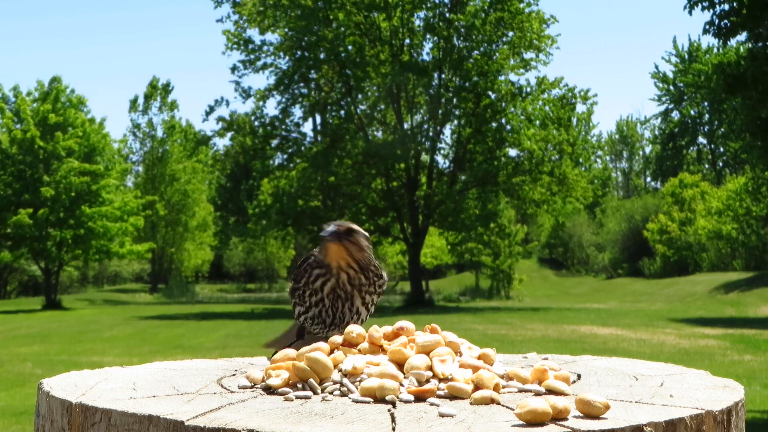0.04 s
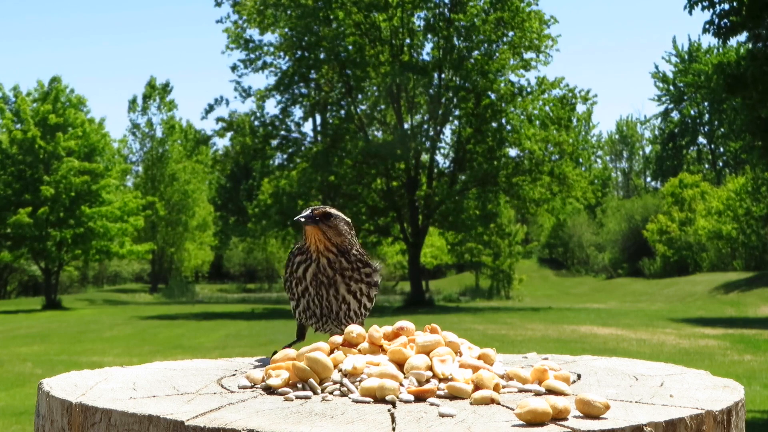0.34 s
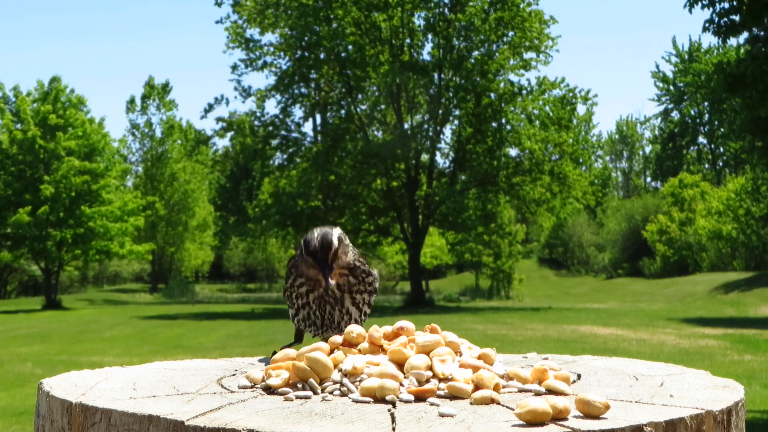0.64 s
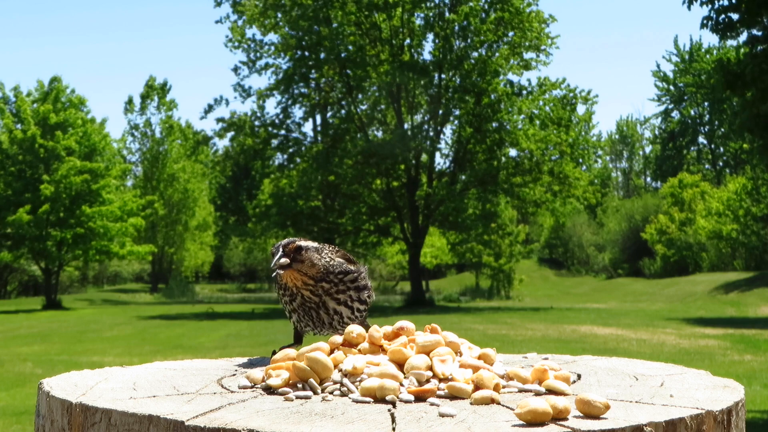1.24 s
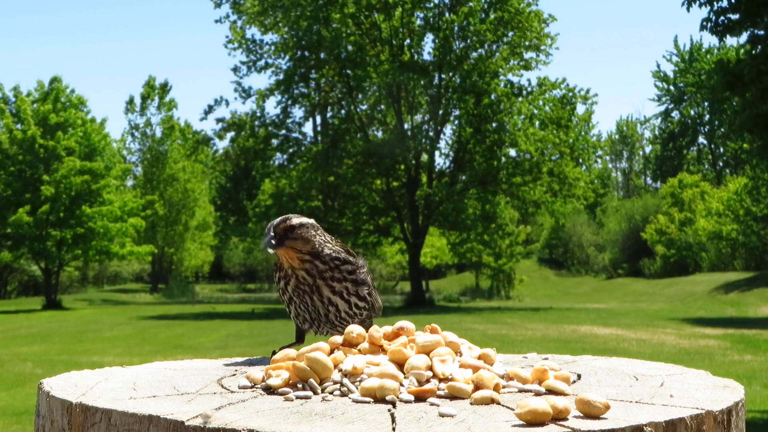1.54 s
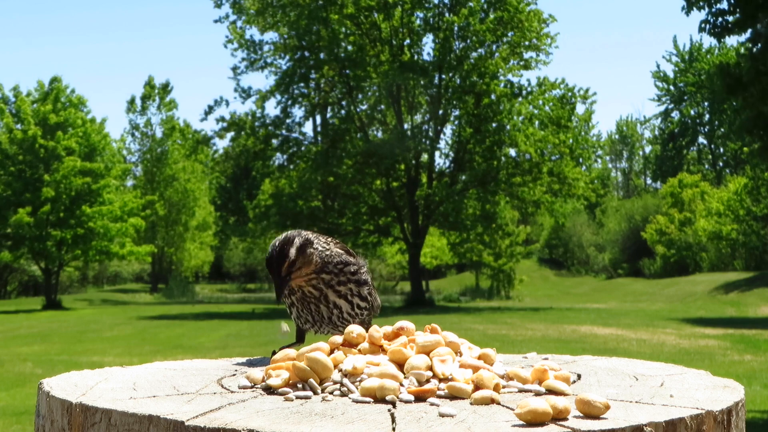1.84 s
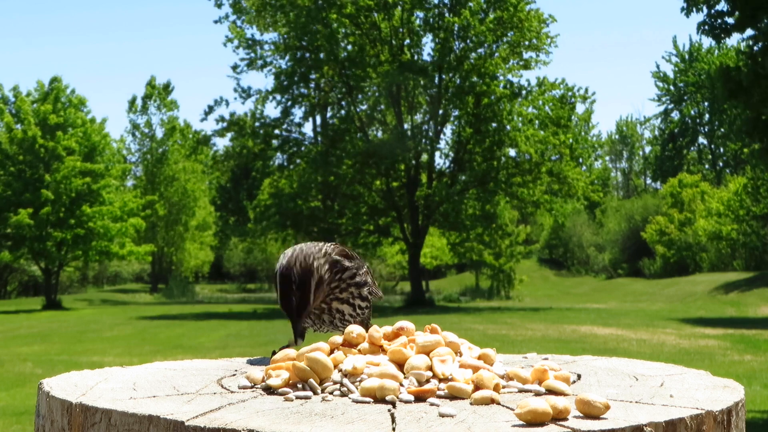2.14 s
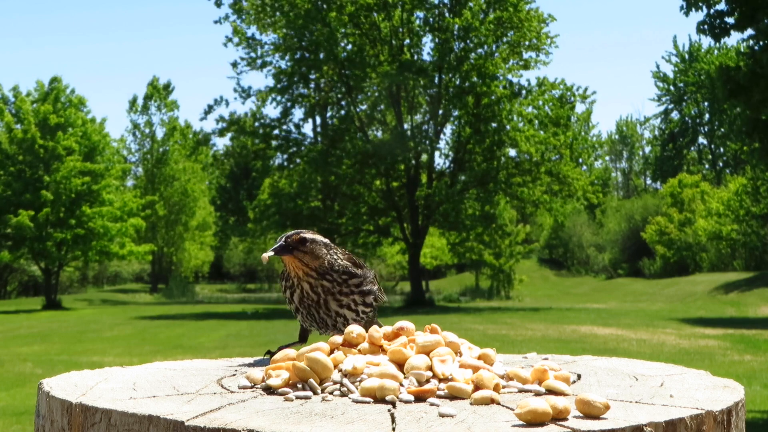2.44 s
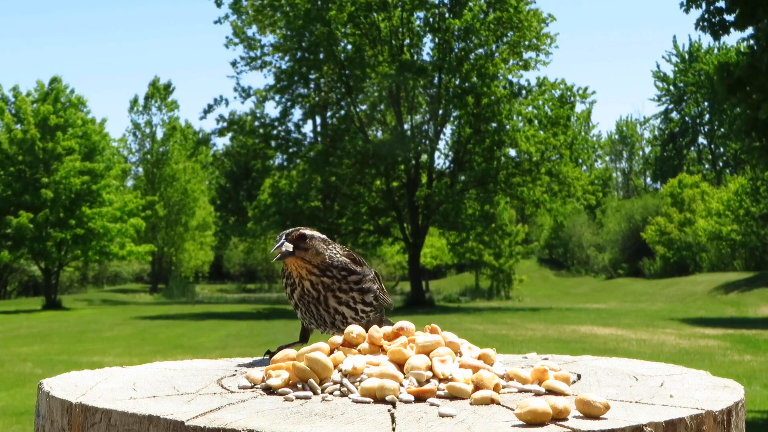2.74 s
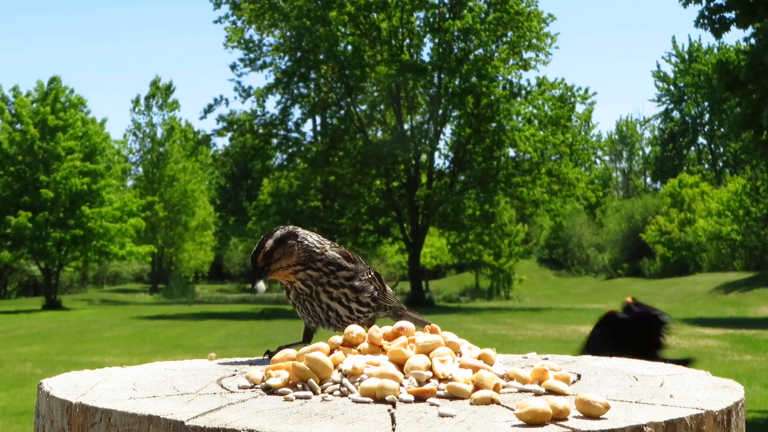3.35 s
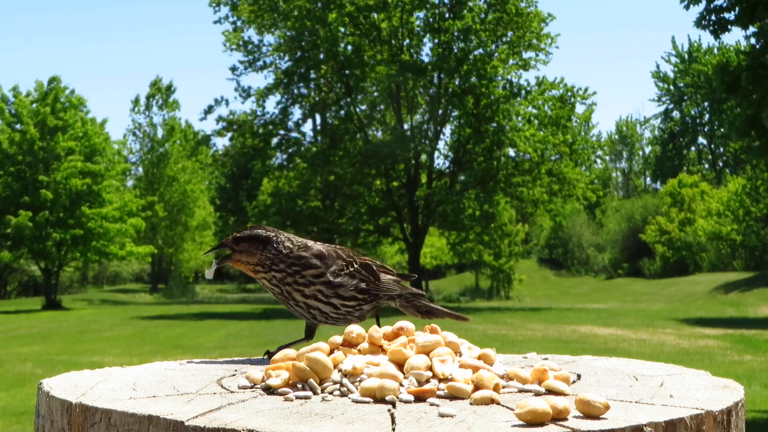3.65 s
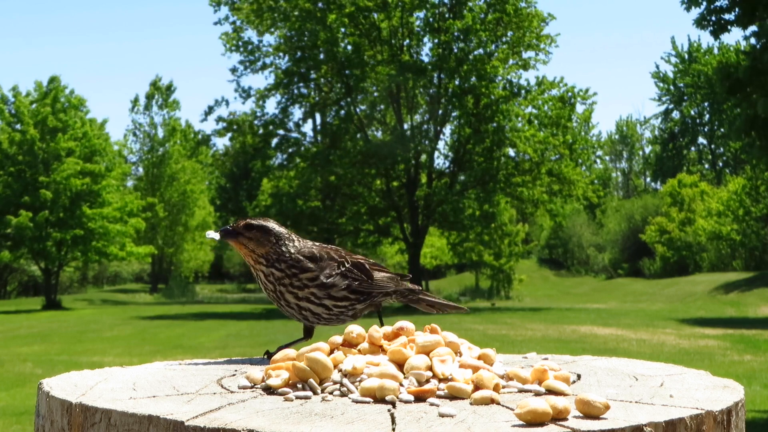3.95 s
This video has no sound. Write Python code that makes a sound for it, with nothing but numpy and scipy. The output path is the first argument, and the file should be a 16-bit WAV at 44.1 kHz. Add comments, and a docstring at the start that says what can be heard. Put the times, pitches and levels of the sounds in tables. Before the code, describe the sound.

A blackbird feeds quietly, then gives eight sharp, loud chips close by in a breezy yard.

```python
"""A blackbird close by gives eight sharp chip notes, each an arch of pitch made by the two sides of
its voice box (the syrinx). It also feeds on a stump: seeds tick in its bill, a wing or foot
rustles, and there is one harsh "chuck". Behind it a breeze blows, a distant mower drones and far
birds whistle from the trees. The recorder adds a glassy edge and a high fizz to the loud chips,
and its gain control turns the whole yard down under them."""
import sys
import numpy as np
from scipy import signal
from scipy.fft import rfft, irfft
from scipy.io import wavfile

SR = 44100
rng = np.random.default_rng(int(sys.argv[2]) if len(sys.argv) > 2 else 0)


def log_audio(samples):
    """Write samples as a 16-bit WAV file to the path given in sys.argv[1]."""
    # one column per channel
    frames = np.atleast_2d(samples).T
    # limit to full scale, then quantise
    limited = np.clip(frames, -1, 1)
    pcm = np.round(limited * 32767).astype(np.int16)
    wavfile.write(sys.argv[1], SR, pcm)


N = 176400
TIME = np.arange(N) / SR

# the breeze and the haze of far birdsong, from low to high pitch: f/Hz, relative level per Hz/dB
BREEZE_AND_HAZE = [(15, -40), (25, -18), (59, -4.5), (90, -8), (154, -8), (301, -9.5), (373, -11),
                   (588, -12), (637, -10), (1860, -20), (4150, -20.5), (5000, -26.5), (9270, -32.5),
                   (12800, -97), (15000, -69)]
# how loud the breeze and haze are over time: t/s, level/dB
BREEZE_LEVEL = [(0, -39), (.5, -39.5), (1.0, -39.5), (1.6, -40), (2.4, -40.5), (3.1, -40), (4, -38)]
# how alike they are on the left and right: f/Hz, likeness (1 = the same)
BREEZE_LIKENESS = [(60, 0.98), (130, 0.33), (290, -0.4), (640, 0.25), (1410, 0.68), (3100, 0.58),
                   (6820, 0.84), (15000, 1)]
# puffs of wind on the microphone: t/s, half-length/s, level/dB, f/Hz
WIND_PUFFS = [(0.058, .04, -38, 56), (1.01, 0.052, -42, 166), (2.808, 0.17, -53, 52.6)]
# the tones of the mower's engine: multiple of the firing rate, level/dB
ENGINE_TONES = [(1, -51.5), (2, -59.5), (3, -61), (4, -61.5), (6, -60), (7, -60.5)]
# far whistles: t/s, length/s, first f/Hz, target f/Hz, glide time/s, relative level/dB, width/Hz
FAR_WHISTLES = [(0.041, 0.28, 4210, 3500, .2, -48, 1000), (.17, 0.31, 3284, 2885, .15, -47.5, 1120),
                (0.698, 0.12, 4470, 4280, 0.076, -45.5, 650), (0.786, .13, 3900, 3340, 0.072, -48, 800),
                (0.808, 0.24, 3150, 2900, .08, -49, 330), (1.058, 0.11, 3690, 3000, 0.057, -45.5, 900),
                (1.13, 0.18, 3160, 2850, 0.12, -47, 300), (1.36, 0.28, 4460, 4100, .2, -49, 650),
                (1.479, 0.38, 3600, 2648, 0.15, -45, 1330), (1.769, 0.16, 4530, 4470, .11, -43, 650),
                (1.766, 0.37, 6720, 6390, 0.1, -54, 1100), (1.872, .26, 3900, 3015, 0.098, -39.5, 1100),
                (2.062, .34, 3230, 2860, .17, -45.5, 560), (2.424, .2, 2460, 2093, .063, -48.5, 70),
                (2.564, 0.25, 4160, 4150, 0.082, -50, 448), (2.905, 0.14, 2395, 2350, 0.054, -45.5, 30),
                (2.879, 0.31, 4150, 2950, 0.22, -43, 1500), (3.021, 0.094, 3100, 2106, 0.065, -41, 110),
                (3.075, 0.073, 2620, 2153, .0185, -45.5, 130)]
# echoes off the stump, lawn and trees: delay/s, level/dB, fade time/s (to -60 dB), stereo width
YARD_ECHOES = [(.005, -12, 0.034, 0.062), (.014, -17, 0.12, 0.57), (.026, -29.5, .025, .3),
               (.03, -28, 0.64, 0.48)]
# seed ticks and, last, one soft low rustle of a wing or foot:
# t/s, level before filtering/dB, fade time/s, low f/Hz, high f/Hz
TICKS_AND_RUSTLE = [(.2545, -24.5, .003, 2500, 10000), (.4494, -44, .002, 2000, 9000),
                    (1.4682, -13.5, 0.00022, 1700, 6400), (1.8892, -11, 0.0015, 3000, 7500),
                    (2.962, -25.5, 0.004, 2000, 6770), (3.6876, -24.5, .001, 3000, 8000),
                    (3.697, -13, .008, 800, 2600)]
# chip notes: t/s, time until the fall/s, top f/Hz, relative level/dB, swell time/s, second voice/dB,
# its entry/s, recorder's edge/dB, extra octave in the fall/dB, octave/dB, recorder's fizz/dB, release/s
CHIP_NOTES = [(3.1830, .0200, 4803, 2, .0085, -22, .009, -8.5, -20, -31, -26.5, 0.0097),
              (3.2521, .0310, 4597, 8, 0.0094, -15, 0.0037, -9.5, -30, -18, -28, 0.0097),
              (3.3374, 0.034, 4444, 8, 0.014, -14, 0.024, -22, -16, -23.5, -26, 0.011),
              (3.4281, 0.03, 4470, 5, 0.019, -13, 0.014, -21, -6.5, -15.5, -22, 0.013),
              (3.5863, .0260, 4550, 7, 0.016, -21, 0.011, -19, -3, -26, -23, 0.012),
              (3.731, .0255, 4504, 6.5, 0.0048, -6.5, 0.019, -14, -9, -21.5, -15, .012),
              (3.8721, 0.024, 4590, 9, 0.0057, -10.5, .0073, -9, 1, -15.5, -17, .012),
              (3.9767, .0270, 4490, 10.5, 0.0039, -5.5, .012, -16, 0, -18, -24, .012)]


def from_db(db):
    """Turn decibels into a gain to multiply by."""
    return 10 ** (np.asarray(db) / 20)


def rms_one(x):
    """Scale a signal so its average strength (rms) is 1."""
    return x / np.sqrt(np.mean(x ** 2) + 1e-20)


def at_hz(points, hz):
    """Read between a table's rows, with octaves evenly spaced."""
    table_hz, values = np.transpose(points)
    return np.interp(np.log(hz), np.log(table_hz), values)


def band(x, low_hz, high_hz, order=2):
    """Keep what lies between two frequencies."""
    sos = signal.butter(order, [low_hz, high_hz], "band", fs=SR, output="sos")
    return signal.sosfilt(sos, x + 1e-18)


def low_pass(x, hz, order=10):
    """Cut the treble; a higher order cuts more steeply."""
    return signal.sosfilt(signal.butter(order, hz, fs=SR, output="sos"), x + 1e-18)


def resonance(x, hz, width_hz):
    """Let one frequency through at full strength and weaken those around it."""
    r = np.exp(-np.pi * width_hz / SR)
    feedback = [1, -2 * r * np.cos(2 * np.pi * hz / SR), r * r]
    return signal.lfilter(np.array([1, 0, -1]) * (1 - r * r) / 2, feedback, x + 1e-18)


def drift(rate_hz):
    """A smooth random wobble of size about 1 that changes at about this rate."""
    hz = np.arange(N // 2 + 1) * SR / N
    return rms_one(irfft(rfft(rng.standard_normal(N)) / (1 + (hz / rate_hz) ** 2), N))


def phase_of(hz):
    """Add up a changing pitch into the angle of a sine wave."""
    return 2 * np.pi * np.cumsum(hz) / SR


def echo_cloud(x, fade_s, delay_s=0, clump_db=4.5):
    """Countless small echoes from grass and leaves arrive in clumps, different on each side."""
    t = TIME[:SR]
    tail = rng.standard_normal((2, SR)) * from_db(clump_db * drift(50)[:SR] - 60 * t / fade_s)
    tail *= t >= delay_s
    return signal.fftconvolve(x[None], tail / np.sqrt(np.sum(tail ** 2) / 2), axes=1)[:, :N]


def breeze():
    """Wind and a haze of far birdsong as flickering bands of noise, with low puffs on the microphone."""
    edges_hz = 22 * 2 ** np.arange(0, 9.6, .5)   # half an octave apart
    out, gust, noise = 0, drift(0.67), rng.standard_normal((2, 2, N))
    for k, (low, high) in enumerate(zip(edges_hz, edges_hz[1:])):
        mid, side = band(noise[k % 2], low, high)   # what left and right share, and how they differ
        hz = np.sqrt(low * high)
        alike = at_hz(BREEZE_LIKENESS, hz)
        gain = from_db(at_hz(BREEZE_AND_HAZE, hz) + 0.24 * gust + drift(5.9))
        out += gain * (np.sqrt(1 + alike) * mid + np.sqrt(1 - alike) * side * [[1], [-1]])
    out = rms_one(low_pass(out, 12000)) * from_db(np.interp(TIME, *np.transpose(BREEZE_LEVEL)))
    for peak_s, half_length, db, hz in WIND_PUFFS:
        rumble = rms_one(band(rng.standard_normal(N), hz / 3.4, hz * 1.52))
        out += from_db(db) * np.exp(-((TIME - peak_s) / half_length) ** 2) * rumble
    return out


def mower(firing_hz=92.45, blade_hz=88.6, blade_db=-51):
    """The engine and the slightly lower blade hum beat against each other and fade in the wind."""
    firing = phase_of(firing_hz * (1 + 0.00794 * drift(1.9)))
    engine = sum(from_db(db + drift(3.6)) * np.sin(k * firing) for k, db in ENGINE_TONES)
    blade = from_db(blade_db + drift(12)) * np.sin(phase_of(blade_hz * (1 + 0.01 * drift(4.1))))
    return np.sqrt(2) * (engine + blade)


def far_whistles():
    """Far birds give falling whistles, which the trees blur into sliding bands of noise."""
    out = np.zeros(N)
    for start, length, first_hz, target_hz, glide, db, width_hz in FAR_WHISTLES:
        span = slice(int(start * SR), int((start + length) * SR))
        t = TIME[span] - TIME[span][0]
        phase = phase_of(target_hz + (first_hz - target_hz) * np.exp(-t / glide))
        blur = low_pass(rng.standard_normal((2, SR)), width_hz / 2, order=3)[:, -len(t):]
        call = rms_one(blur[0] * np.sin(phase) + blur[1] * np.cos(phase)) / np.sqrt(2)
        fade_in_out = np.clip(np.minimum(t, length - t) / 0.02, 0, 1)
        out[span] += from_db(db) * fade_in_out * call
    out *= from_db(0.63 * drift(40))   # a slight flutter
    return from_db(-0.5) * (out + echo_cloud(out, fade_s=1))


def yard(x, left_lag_s=8e-6, pan_db=0.5):
    """A near sound and its echoes reach the right microphone a little earlier and louder."""
    out = np.array([x, x])
    for delay, db, fade_s, width in YARD_ECHOES:
        mid, side = echo_cloud(x, fade_s, delay) / np.sqrt(2)
        out += from_db(db) * (mid + width * side * [[1], [-1]])
    hz = np.arange(N + 1) * SR / (2 * N)
    lag = np.exp(-2j * np.pi * hz * np.array([[left_lag_s], [0]]))
    return irfft(rfft(out, 2 * N) * lag)[:, :N] * from_db([[-pan_db], [pan_db]])


def feeding():
    """Seeds tick in the bill and a wing or foot rustles once: each is a click and fading noise."""
    out, t = np.zeros(N), TIME[:SR // 20]
    click = -2 * (t == 0)
    for start, db, fade_s, low_hz, high_hz in TICKS_AND_RUSTLE:
        i = int(start * SR)
        tail = from_db(-8.5) * rng.standard_normal(len(t)) * np.exp(-t / fade_s)
        out[i:i + len(t)] += from_db(db) * band(click + tail, low_hz, high_hz, order=1)
    return low_pass(out, 12360)


def chuck(start_s=2.4645, burst_hz=2780, tail_hz=2550, width_hz=620):
    """A harsh burst of noise rings in the throat, with a lower, softer tail."""
    t = np.maximum(TIME - start_s, 0)
    burst, tail = (rms_one(resonance(resonance(rng.standard_normal(N), hz, width_hz), hz, width_hz))
                   for hz in (burst_hz, tail_hz))
    burst *= np.exp(-(t / .006) ** 2)
    tail *= from_db(-9) * np.exp(-t / .03)
    return from_db(-23.5) * np.clip(t / 0.0021, 0, 1) * (burst + tail)


def chips(onset_hz=2344, creep_hz_per_s=7400, end_hz=590, second_hz=3303):
    """Two voices arch up and down and mix in the syrinx. Returns the call and wide recorder fizz."""
    tracks, t = np.zeros((4, N + SR)), TIME[:SR // 10]
    wobbles = np.array([drift(210), drift(1000), drift(600), drift(290)])
    for (start, hold, top_hz, db, swell, second_db, entry,
         edge_db, fall_octave_db, octave_db, fizz_db, release) in CHIP_NOTES:
        i, pick = int(start * SR), rng.integers(N - len(t))
        waver, flutter, jitter, flicker = wobbles[:, pick:pick + len(t)]
        # The pitch leaps up, creeps higher, then drops away.
        falling_s = 0.00164 * np.logaddexp(0, (t - hold) / 0.00164)   # time since the fall began
        fall = 1 - np.exp(-falling_s / 0.0062)   # 0 while the note is held, then up to 1
        rise = (1 - (1 - onset_hz / top_hz) * np.exp(-(t / .0046) ** 2.4)) * (1 + 0.0095 * waver)
        held_hz = (top_hz + creep_hz_per_s * (t - hold / 2)) * rise
        first = phase_of(end_hz + (held_hz - end_hz) * np.exp(-falling_s / .0088))
        second = phase_of(second_hz * rise * np.exp(-falling_s / .016))
        # The first voice has an octave overtone; the recorder adds a glassy edge near 14 kHz.
        octave = from_db(octave_db) + from_db(fall_octave_db) * fall ** 2
        octave += from_db(-32) * np.exp(-t / .0046)
        edge = from_db(edge_db) * rise ** 8 * (1 - fall) ** 6
        highs = octave * np.sin(2 * first + .45 * jitter) + edge * np.sin(3 * first + .45 * jitter)
        tone = np.sin(first) + highs * from_db(4.5 * flicker)
        # The second voice joins, and mixing the two makes two more tones.
        second_gain = from_db(second_db) * np.clip((t - entry) / 0.0011, 0, 1)
        sum_tone = from_db(-2) * np.sin(first + second + .45 * flutter)
        difference_tone = from_db(-11) * np.sin(2 * first - second)
        tone += second_gain * (np.sin(second) + sum_tone + difference_tone)
        # The recorder's high fizz rides on the loud note.
        fizz = band(rng.standard_normal(len(t)), 7000, 10600, order=4)
        fizz *= from_db(fizz_db) + from_db(-13) * fall
        # The note stays weak until its pitch has risen, and turns rough as it falls.
        attack = rise ** 0.36 * np.sin(np.pi / 2 * np.clip(t / 0.0018, 0, 1)) ** 2
        loudness = from_db(db) * attack * (1 - 0.56 * np.exp(-t / swell))
        loudness *= np.exp(-(falling_s / release) ** 3.3)
        note = loudness * (tone + fizz) * (1 + 0.65 * fall * flutter)
        tracks[:, i:i + len(t)] += [note, note * fall, loudness, loudness * fall]
    notes, falls, note_level, fall_level = tracks[:, :N]
    wide_fizz = band(rng.standard_normal((2, N)), 8500, 10100, order=4)
    wide_fizz *= from_db(-30.5) * note_level + from_db(-27.5) * fall_level
    # Each note breaks with a low croak and a bright spray of noise.
    croak = from_db(-22.5) * fall_level * band(rng.standard_normal(N), 1100, 3200)
    spray = from_db(-25) * resonance(fall_level * rng.standard_normal(N), hz=5460, width_hz=710)
    stump_echo = from_db(-6) * echo_cloud(falls, fade_s=0.058, delay_s=0.0016)[0]
    # The throat favours whichever tone slides through its resonance.
    throat = resonance(notes + stump_echo, hz=4550, width_hz=910)
    return throat + croak + spray, wide_fizz


def scene():
    """The near blackbird and its echoes, over the far sounds."""
    call, wide_fizz = chips()
    return yard(call + feeding() + chuck()) + wide_fizz + far_whistles() + breeze() + mower()


def record(dry, limit_db=-2, attack_s=0.0057, recover_db_per_s=5):
    """Gain control dips fast on loud peaks and comes back slowly; then the highest treble is cut."""
    over_db = np.maximum(20 * np.log10(np.abs(dry).max(axis=0) + 1e-9) - limit_db, 0)
    recovery_db = recover_db_per_s * TIME
    held_db = np.maximum.accumulate(over_db + recovery_db) - recovery_db
    r = np.exp(-1 / (attack_s * SR))
    smooth_db = signal.lfilter([1 - r], [1, -r], held_db)
    ducked = dry * from_db(-np.interp(TIME + attack_s, TIME, smooth_db))   # looks slightly ahead
    return signal.sosfilt(signal.cheby2(12, 70, 16500, fs=SR, output="sos"), ducked)


dry = scene()
out = record(dry)
log_audio(out)
```